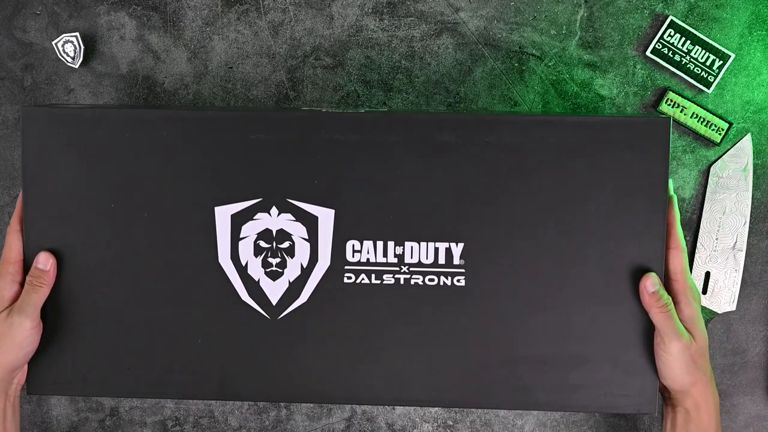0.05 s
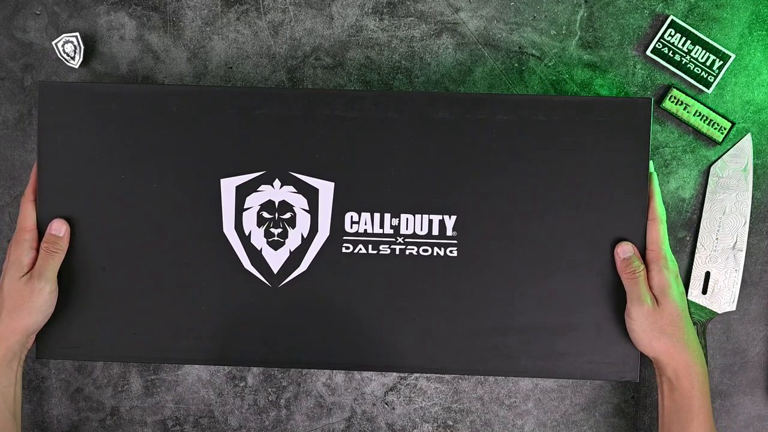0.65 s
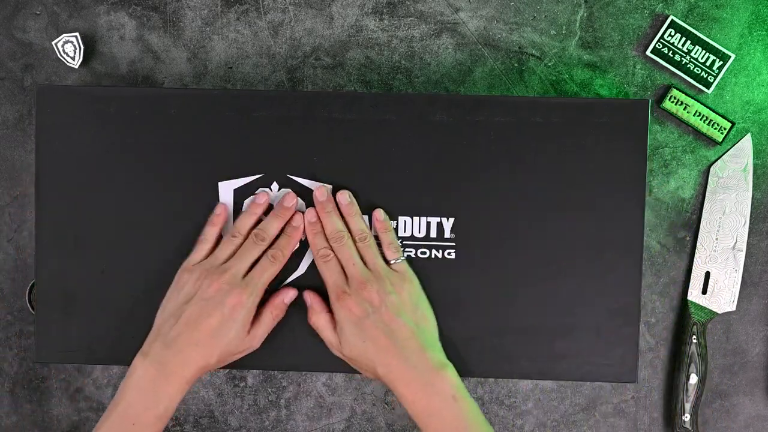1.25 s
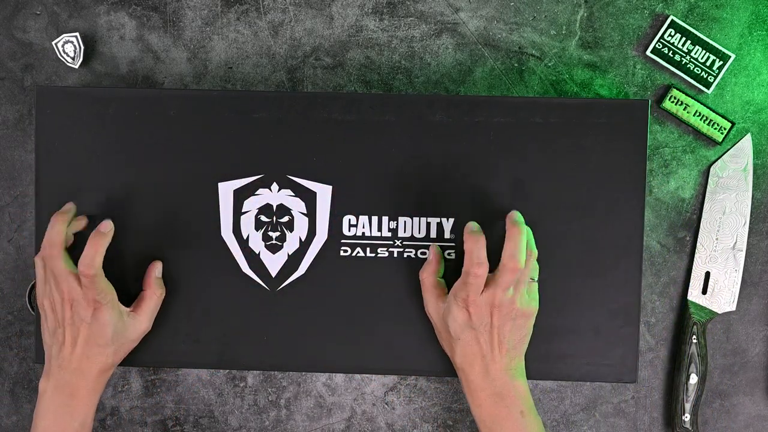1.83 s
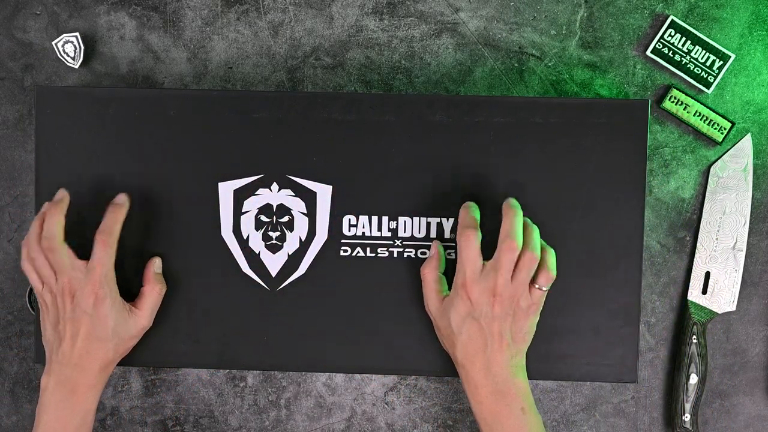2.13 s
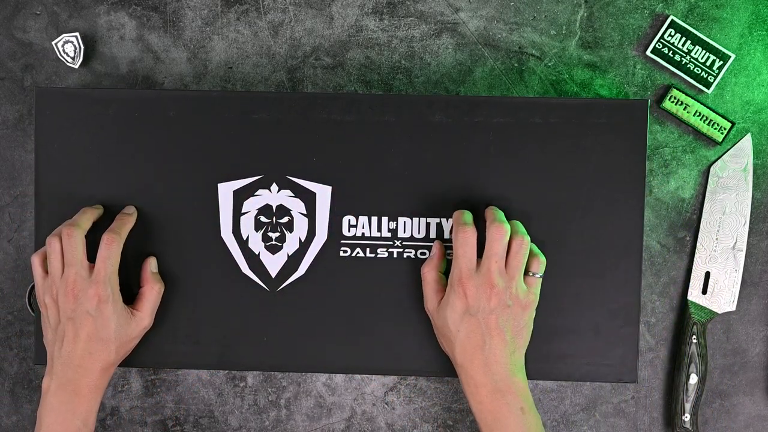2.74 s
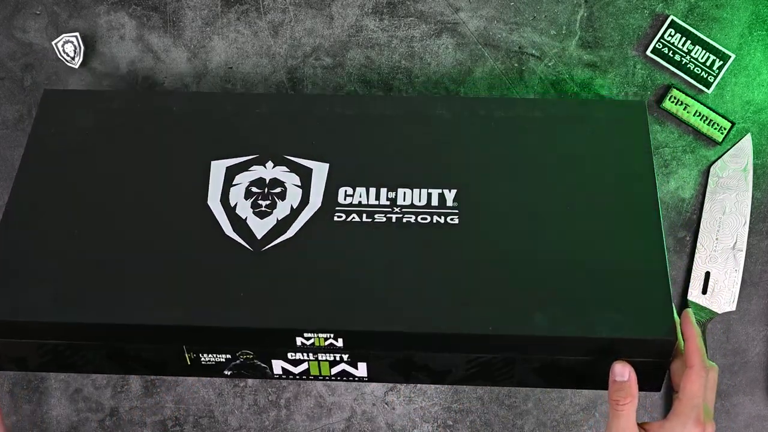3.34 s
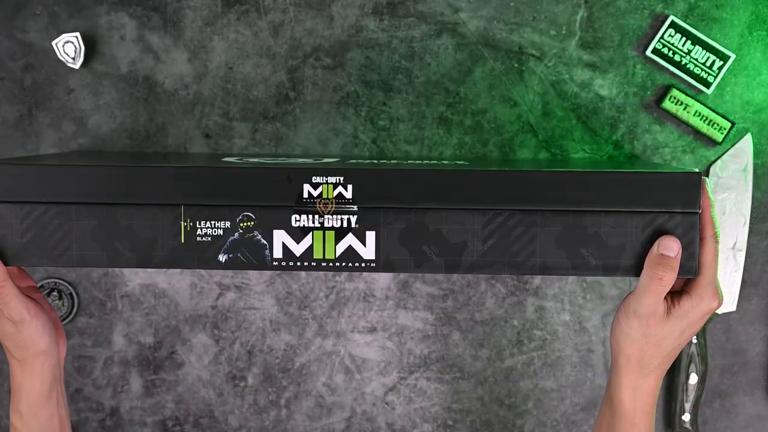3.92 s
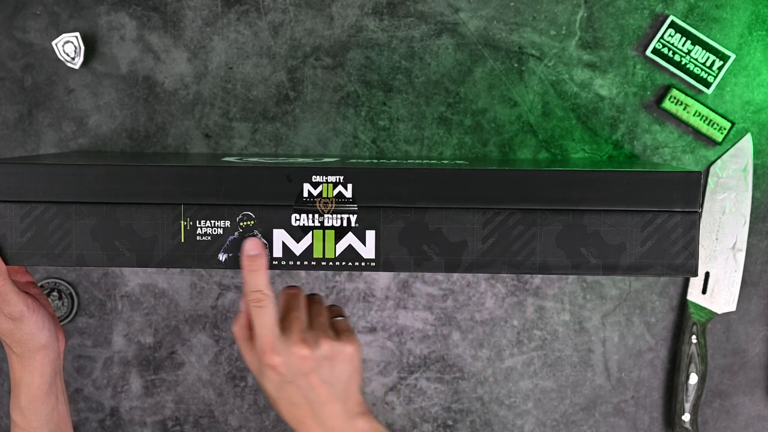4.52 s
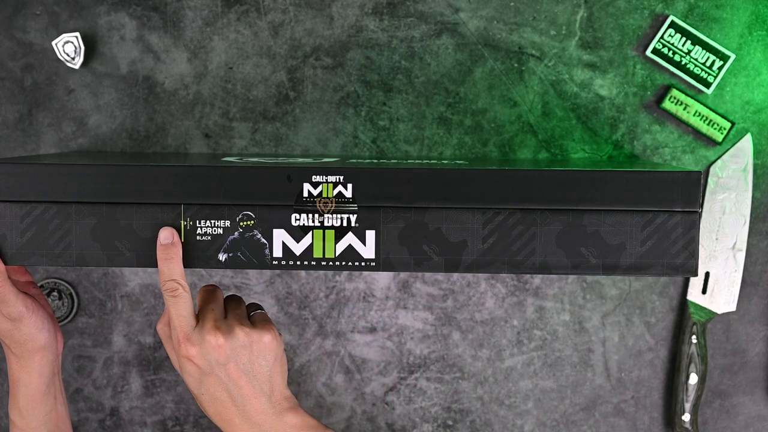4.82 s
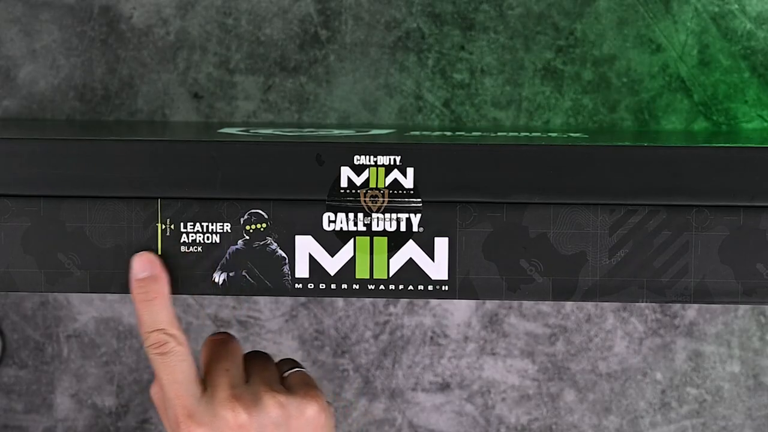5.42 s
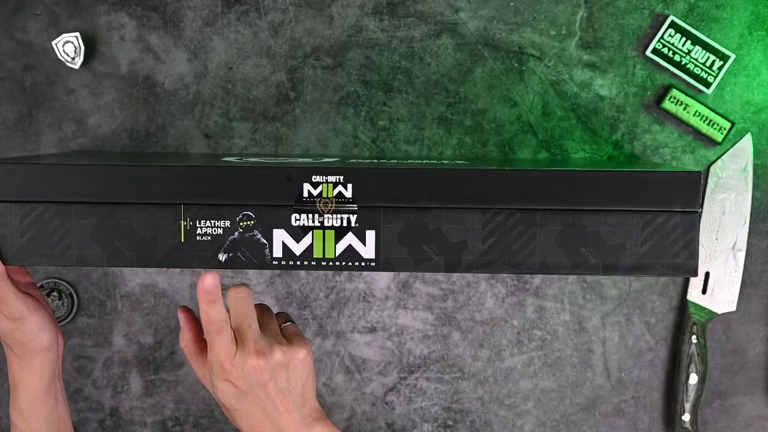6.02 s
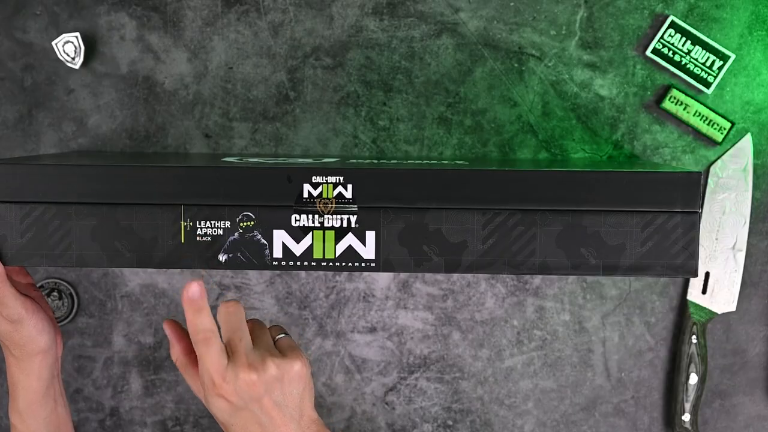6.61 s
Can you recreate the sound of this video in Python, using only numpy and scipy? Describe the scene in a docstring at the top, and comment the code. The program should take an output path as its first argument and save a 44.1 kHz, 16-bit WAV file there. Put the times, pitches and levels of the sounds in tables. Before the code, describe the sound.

Hands scuff and tick against a large cardboard box, which lands on a table with a dull, hollow thud at about 0.4 seconds and gives a small creak. From 0.8 to 1.5 seconds palms brush softly across the papery lid, with a tick near 1 second and a light pat just after. Fingers drum two quick rolls on the lid, at about 1.9 and 2.4 seconds, each five or six hollow knocks; these are the loudest sounds. From 3 to 3.8 seconds the box is tipped up with faint sliding, small taps and creaks, ending in a sharper click. It settles with a soft bump at 4.4 seconds. Sparse, faint fingertip taps follow, with a clearer one at 6.2 seconds. The sound is close and leans left, in a small room with short reverberation, low rumble, faint hum and hiss.

```python
"""Cardboard gift box on a table.

A large gift box is set down in a small room. Palms brush its lid, fingers drum two quick rolls on it,
then it is tipped on edge and tapped lightly. Each blow rings the panels and the air inside, cracks
the paper skin and shakes the table. One close microphone, panned left, over quiet rumble and hiss."""
import sys
import numpy as np
from scipy import signal
from scipy.fft import rfft, irfft
from scipy.io import wavfile
from scipy.ndimage import uniform_filter1d

SR = 44100
rng = np.random.default_rng(int(sys.argv[2]) if len(sys.argv) > 2 else 0)


def digitize_waveform(pressure):
    """Quantize a signal to 16-bit integers and store it at the path in sys.argv[1].

    Rows of a 2-D input are taken as channels; values are limited to [-1, 1].
    """
    field = np.atleast_2d(pressure).T
    bounded = np.clip(field, -1, 1)
    quanta = np.round(bounded * 32767).astype(np.int16)
    wavfile.write(sys.argv[1], SR, quanta)


N = 293706

# Levels in the tables are relative; each source applies its own gain.
# the box's damped panel modes: (frequency [Hz], level [dB], t60 [s])
PANEL_MODES = [(119.3, -30, .04), (197, -9.5, .06), (232, -6.5, 0.035), (369, -1.5, 0.026),
               (476, -5, 0.028), (586.4, -6.5, 0.029), (746, -14, 0.033), (954, -15.5, 0.022),
               (1320, -19.5, 0.028), (2400, -22, .015)]
# spectrum of the paper skin cracking: (frequency [Hz], level [dB])
CRACK_SPECTRUM = [(200, -10), (600, -0.5), (1300, 11), (2200, -6), (4500, -7.5), (8000, -17.5),
                  (15000, -22.5)]
# the box coming down on the table, first flat, later on its edge: (time [s], level [dB])
BOX_LANDINGS = [(0.4243, -20), (4.367, -45)]
# two finger rolls on the lid: (time [s], level [dB], contact cut-off [Hz], struck spot's note [Hz])
FINGER_HITS = [(1.8844, -25, 3000, 172), (1.925, -18, 850, 361.2), (1.949, -29, 1200, 600),
               (1.961, -11.5, 1050, 172), (2.010, -19.5, 1120, 169.3), (2.343, -38.5, 202.5, 183),
               (2.3503, -25.5, 1490, 455), (2.3534, -15.5, 900, 484), (2.3723, -10, 1200, 410),
               (2.393, -8.5, 1400, 360.4), (2.411, -17.5, 1000, 219)]
# light touches of palm or fingertip: (time [s], level [dB], struck spot's note [Hz], paper crack [dB])
LIGHT_TAPS = [(0.3425, -43, 230, -18), (1.1763, -44.5, 510, -20), (1.197, -39, 131, -16.5),
              (3.033, -58.5, 500, 4), (3.076, -53, 219, -6), (3.255, -56, 190, -16), (3.392, -53, 199, -16),
              (4.398, -46, 420, -23), (4.405, -41.5, 213, -36), (4.8172, -57.5, 776, 6.5),
              (5.645, -64.5, 716, 7.5), (6.0, -67, 790, 6), (6.1982, -47, 890, 4.5),
              (6.202, -34.5, 168, -18), (6.222, -46.5, 300, -18), (6.597, -58.5, 200, -13)]
# edges and flaps ticking: (time [s], level [dB], note [Hz], snap level [dB], snap centre [Hz])
EDGE_TICKS = [(0.12, -49, 1010, -1, 2480), (0.3294, -43, 1690, 11.5, 8000), (0.3396, -41, 850, 12, 1980),
              (0.380, -50, 1000, -4, 1600), (0.968, -39.5, 587, 13.5, 1300), (3.4291, -41.5, 1140, 0, 1970),
              (3.447, -41, 1300, 3, 1900), (3.514, -45.5, 1330, 4, 2160), (3.759, -45, 6700, 3, 8800),
              (3.780, -28, 1060, -2, 2380), (4.365, -63.5, 1760, 26.5, 7500), (4.592, -50.5, 1120, 5, 2660)]
# cardboard creaking as it takes up load: (start [s], length [s], level [dB])
LOAD_CREAKS = [(0.469, .11, -54.5), (3.435, .085, -49.5)]
# palms brushing the paper: (start [s], length [s], level [dB])
BRUSH_STROKES = [(0.84, 0.44, -61.5), (1.0, 0.22, -76), (1.245, 0.31, -61.5), (3.41, .13, -68.5),
                 (3.612, 0.046, -66.5), (3.785, 0.055, -72)]
# spectrum of palm on paper: (frequency [Hz], level [dB])
BRUSH_SPECTRUM = [(400, 1), (900, -2), (2300, -4.5), (4500, 0), (7500, -3.5), (11000, -1), (14500, 0),
                  (16000, 1)]
# the box's edge sliding as it tips up: (start [s], length [s], level [dB])
SLIDE_STROKES = [(3.03, 0.438, -61.5), (3.47, 0.058, -66.5), (3.54, 0.045, -70), (3.7, 0.12, -73)]
# spectrum of the sliding edge: (frequency [Hz], level [dB])
SLIDE_SPECTRUM = [(300, 4), (700, 5), (1100, 3), (1700, 2), (3600, 5), (5000, 1.5), (8000, -6.5),
                  (15000, -18)]
# hands shifting their grip and weight: (start [s], length [s], level [dB])
GRIP_STROKES = [(0.03, 0.16, -62), (0.18, 0.15, -58.5), (0.31, 0.15, -53.5), (1.195, .12, -55)]
# spectrum of the grip and the skidding base: (frequency [Hz], level [dB])
GRIP_SPECTRUM = [(300, 16), (1000, 2), (2500, -0.5), (5000, -7.5), (8000, -12), (15000, -17)]
# the small room's reverberation: (band [Hz], level [dB], t60 [s])
ROOM_BANDS = [(50, -23, .7), (110.65, -14, 0.47), (171, -7, 0.68), (275.6, -8.5, 0.65), (520, -9, 0.69),
              (1010, -9.5, 0.98), (2000, -7, 0.67), (4987, -6.5, 0.64), (14000, -23, 0.21)]
# spectrum of the room's rumble: (frequency [Hz], level [dB])
RUMBLE_SPECTRUM = [(25, -24), (60, -4), (110, -10.5), (170, -8.5), (330, -12.5), (550, -20), (800, -20),
                   (1600, -24.5), (3000, -37), (12000, -65)]
# faint whines in the room: (start [s], end [s], frequency [Hz], level [dB])
FAINT_WHINES = [(3.528, 3.8, 723, -73.5), (3.89, 6.66, 1776, -78.5)]
# spectrum of each channel's hiss: (frequency [Hz], level [dB])
HISS_SPECTRUM = [(500, -8.5), (2000, -2), (6000, -3), (16000, -7)]


def blow(contact_hz, spot_hz, spot_db, paper_db, thud_db, slap_s=.007, sway_s=.048, flesh_hz=1500):
    """One blow rings the panels and the air inside, cracks the paper skin and shakes the table."""
    t = np.arange(SR // 2) / SR
    panels = sum(undb(db + rng.standard_normal()) * ring(t, hz, t60) for hz, db, t60 in PANEL_MODES)
    air = undb(-28) * ring(t, hz=164, t60=.72)
    spot = undb(spot_db) * ring(t, spot_hz, t60=.018)
    body = butter(panels + air + spot, contact_hz, "low", order=1)
    body = butter(body, flesh_hz, "low", order=1)  # soft flesh pushes for longer, rounding off the top
    # the crack starts with a sharp edge and comes again as the lid slaps the base
    edge = undb(3) * fade(t, t60=.011)
    slap = undb(-6) * np.interp(t - slap_s, t, edge, left=0)
    tail = undb(-5) * fade(t, t60=.034)
    crack = undb(paper_db - 7) * noise(CRACK_SPECTRUM, len(t)) * (edge + slap + tail)
    box = butter(body + crack, hz=102, kind="high", order=5)  # the panels radiate little deep bass
    # the heavy table takes a moment to sway, while its top gives a short boom at once
    sway = ring(t, hz=32, t60=.6) + undb(-2) * ring(t, hz=45, t60=.54)
    sway *= 1 - np.exp(-t / sway_s)
    boom = undb(2) * butter(ring(t, hz=138, t60=.041), 100, "high")
    return -(box + undb(thud_db - 4) * (sway + boom))


def drumming(nail_s=.0046, nail_db=-17, usual_db=-17, crack_lag=.45, crisp_hz=1400):
    """Each finger lands on the lid with its pad, then with its nail."""
    out = np.zeros(N)
    for s, db, contact_hz, spot_hz in FINGER_HITS:
        # the paper's crack grows more slowly than the force and fades with a soft contact
        softness_db = 7 * np.log2(min(contact_hz / crisp_hz, 1))
        paper_db = -13.5 - crack_lag * (db - usual_db) + softness_db
        pad = blow(contact_hz, spot_hz, spot_db=-3, paper_db=paper_db, thud_db=-30.5)
        nail = blow(contact_hz=1490, spot_hz=900, spot_db=4, paper_db=-16.5, thud_db=-27.5)
        add(out, s, undb(db) * pad)
        add(out, s + nail_s, undb(db + nail_db) * nail)
    return out


def landings(lead_s=.008, lead_db=-11.5, rock_s=.0157, rock_db=-18, rock_loss_db=2):
    """One edge touches, the base lands with its full weight, and the box rocks to rest."""
    out = np.zeros(N)
    for s, db in BOX_LANDINGS:
        edge = blow(contact_hz=510, spot_hz=137, spot_db=18, paper_db=0, thud_db=-5)
        base = blow(contact_hz=950, spot_hz=285, spot_db=2, paper_db=-10, thud_db=1)
        add(out, s - lead_s, undb(db + lead_db) * edge)
        add(out, s, undb(db) * base)
        for k in range(3):
            rock = blow(contact_hz=280, spot_hz=188, spot_db=7.5, paper_db=-3, thud_db=16)
            add(out, s + (k + 1) * rock_s, undb(db + rock_db - k * rock_loss_db) * rock)
    return out


def taps(contact_ratio=1.43):
    """Light touches mostly sound the spot that they hit; the softer the contact, the lower the note."""
    out = np.zeros(N)
    for s, db, spot_hz, paper_db in LIGHT_TAPS:
        touch = blow(contact_ratio * spot_hz, spot_hz, spot_db=13, paper_db=paper_db, thud_db=-17.5)
        add(out, s, undb(db) * touch)
    return out


def tick(hz, snap_db, snap_hz, note_cycles=25.7, snap_cycles=24, spread=1.69):
    """A stiff edge lets go: one short note and a dry snap; the flap shudders on around the note."""
    t = np.arange(SR // 8) / SR
    note = ring(t, hz, t60=note_cycles / hz)
    snap = butter(rng.standard_normal(len(t)), [snap_hz / spread, snap_hz * spread], "band", order=3)
    snap = undb(snap_db - 6) * unit(snap) * fade(t, t60=snap_cycles / snap_hz)
    shudder = butter(rng.standard_normal(len(t)), hz * np.exp([-.24, .24]), "band", order=1)
    shudder = undb(-23) * unit(shudder) * fade(t, t60=.29)
    return note + snap + shudder


def ticks_and_creaks(creak_hz=1200, detune=.2, scatter_db=1.5, count=8):
    """Edges tick singly, and loaded cardboard creaks in short random runs of ticks, with no bass."""
    out = np.zeros(N)
    for s, db, hz, snap_db, snap_hz in EDGE_TICKS:
        add(out, s, undb(db) * tick(hz, snap_db, snap_hz))
    for start, length, db in LOAD_CREAKS:
        for k, (weakness, pitch) in enumerate(rng.standard_normal((count, 2))):
            creak = tick(creak_hz * np.exp(detune * pitch), snap_db=7, snap_hz=2400)
            s = start + length * (k + rng.random()) / count
            add(out, s, undb(db - scatter_db * weakness) * creak)
    return butter(out, hz=300, kind="high")


def rub(speed, spectrum, grain_db, grain_hz):
    """Friction on matt paper: a hiss that catches and slips, following the speed of the stroke."""
    return speed * unit(noise(spectrum, N) * undb(grain_db * wander(grain_hz)))


def stroke_speed(strokes, skew, taper):
    """Each rubbing stroke is one arch, peaking later with more skew and narrower with more taper."""
    t = np.arange(N) / SR
    speed = np.zeros(N)
    for start, length, db in strokes:
        progress = np.clip((t - start) / length, 0, 1)
        speed += undb(db) * np.abs(np.sin(np.pi * progress ** skew)) ** taper
    return speed


def skid_speed(early_s=.0023, width_s=.01):
    """The base moves over the table: a quick skid at each landing, then a dying creep."""
    t = np.arange(N) / SR
    speed = np.zeros(N)
    for s, db in BOX_LANDINGS:
        skid = undb(db - 19) * np.exp(-((t - s + early_s) / width_s) ** 2)
        creep = undb(db - 31) * (t > s) * fade(np.abs(t - s), t60=.93)
        speed += skid + creep
    return speed


def friction():
    """Close-up rubbing: palms brush the lid, the edge slides, the grip shifts and the base skids."""
    brush = stroke_speed(BRUSH_STROKES, skew=1.07, taper=.75)
    slide = stroke_speed(SLIDE_STROKES, skew=2.8, taper=.2)
    grip = stroke_speed(GRIP_STROKES, skew=1.2, taper=.52)
    return (undb(5.5) * rub(brush, BRUSH_SPECTRUM, grain_db=1.1, grain_hz=250)
            + undb(4.5) * rub(slide, SLIDE_SPECTRUM, grain_db=.5, grain_hz=310)
            + rub(grip + skid_speed(), GRIP_SPECTRUM, grain_db=6.5, grain_hz=89))


def room_reflections(x, first_s=.0032, build_s=.0018):
    """Diffuse reflections build up at the microphone after the first wall; the treble dies first."""
    t = np.arange(SR) / SR
    hz, db, t60 = np.transpose(ROOM_BANDS)
    log_hz = np.log(np.fft.rfftfreq(SR, 1 / SR) + 1)
    phases = np.exp(2j * np.pi * rng.random(len(log_hz)))
    response = np.zeros(SR)
    for share, band_db, band_t60 in zip(np.eye(len(hz)), db, t60):
        band = irfft(phases * np.interp(log_hz, np.log(hz), share), SR)
        decay = fade(t, band_t60) * np.sqrt(2 * np.log(1000) / band_t60)  # same energy at any t60
        response += undb(band_db) * band * decay
    onset = np.clip((t - first_s) / build_s, 0, 1)
    return signal.fftconvolve(x, response * onset)[:N]


def room_tone(hum_hz=117, hum_db=-70.5, rumble_db=-64, waver_db=2.5):
    """Behind the box: room rumble, an appliance's hum and faint wavering whines."""
    t = np.arange(N) / SR
    hum = np.sqrt(2) * np.sin(2 * np.pi * hum_hz * t + wander(17))
    hum *= undb(hum_db + waver_db * wander(5.2))
    drone = undb(rumble_db + .5 * wander(5)) * noise(RUMBLE_SPECTRUM, N) + hum
    lull = gate(start_s=3.43, end_s=3.86, ramp_samples=400)  # the low end drops away briefly
    out = (1 - lull) * drone + lull * butter(drone, hz=300, kind="high")
    for start, end, hz, db in FAINT_WHINES:
        whine = np.sqrt(2) * np.sin(2 * np.pi * hz * t) * undb(db + waver_db * wander(3.14))
        out += whine * gate(start, end, ramp_samples=1000)
    return out


def undb(db):
    """Decibels to gain."""
    return 10 ** (np.asarray(db) / 20)


def unit(x):
    """Scale to rms 1."""
    return x / np.sqrt(np.mean(x ** 2))


def butter(x, hz, kind, order=2):
    """Causal low-, high- or band-pass."""
    sections = signal.butter(order, np.clip(hz, 5, SR / 2 - 500), kind, fs=SR, output="sos")
    return signal.sosfilt(sections, x)


def noise(spectrum, size):
    """Noise of rms 1 shaped by (frequency [Hz], level [dB]) points."""
    hz, db = np.transpose(spectrum)
    log_hz = np.log(np.fft.rfftfreq(size, 1 / SR) + 1)
    gain = undb(np.interp(log_hz, np.log(hz), db))
    return unit(irfft(rfft(rng.standard_normal(size)) * gain, size))


def fade(t, t60):
    """Exponential decay, 60 dB down at t60."""
    return np.exp(-np.log(1000) * t / t60)


def ring(t, hz, t60):
    """One struck mode."""
    return np.sin(2 * np.pi * hz * t) * fade(t, t60)


def wander(rate_hz):
    """Smooth random drift of spread near 1."""
    return np.interp(np.arange(N) / SR * rate_hz, np.arange(4096), rng.standard_normal(4096))


def gate(start_s, end_s, ramp_samples):
    """1 between two times and 0 outside, with ramped edges."""
    t = np.arange(N) / SR
    return uniform_filter1d(1. * ((t > start_s) & (t < end_s)), size=ramp_samples)


def add(track, s, sound):
    """Mix a sound into a track at time s."""
    start = int(s * SR)
    track[start:start + len(sound)] += sound[:N - start]


def pan(left_lead_db):
    """Left and right gains with a mean of 1."""
    gains = undb(np.array([[left_lead_db], [-left_lead_db]]) / 2)
    return gains / gains.mean()


def scene():
    """Box, hands and room reach one close microphone, panned left; each channel adds its own hiss."""
    blows = landings() + drumming() + taps()
    clicks = ticks_and_creaks()
    direct = blows + clicks + friction()
    microphone = direct + room_reflections(blows + undb(-13.5) * clicks) + room_tone()
    hiss = undb(-68) * np.array([noise(HISS_SPECTRUM, N) for _ in range(2)])
    return pan(left_lead_db=10.5) * microphone + pan(left_lead_db=4) * hiss


def record(dry):
    """The recorder cuts the top steeply."""
    top_hz = 15900
    return signal.sosfilt(signal.ellip(10, .1, 70, top_hz, fs=SR, output="sos"), dry)


dry = scene()
out = record(dry)
digitize_waveform(out)
```